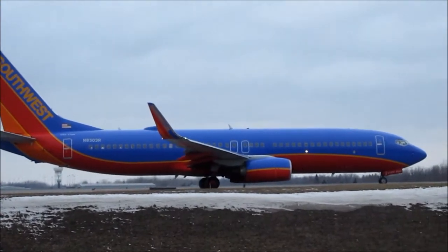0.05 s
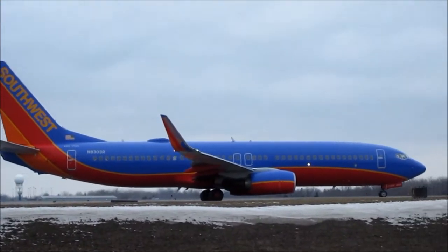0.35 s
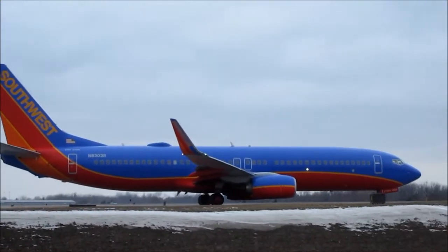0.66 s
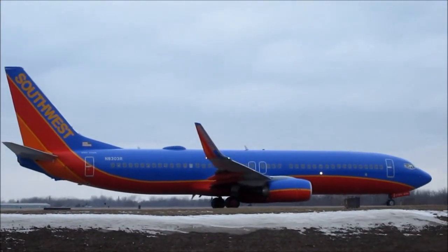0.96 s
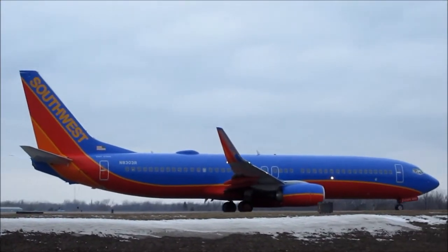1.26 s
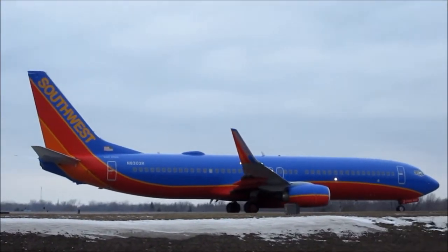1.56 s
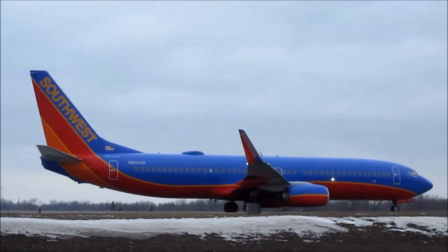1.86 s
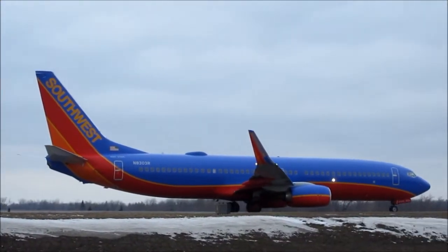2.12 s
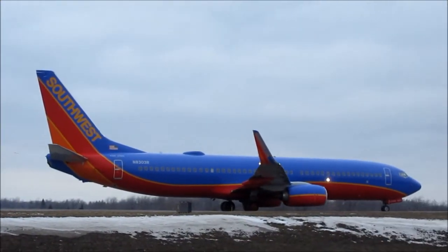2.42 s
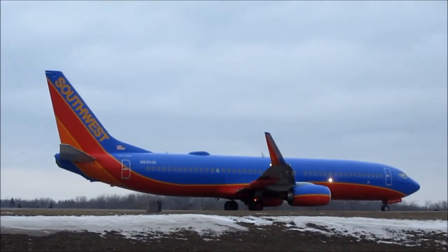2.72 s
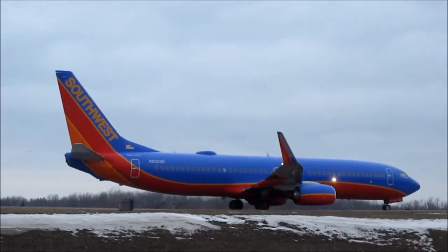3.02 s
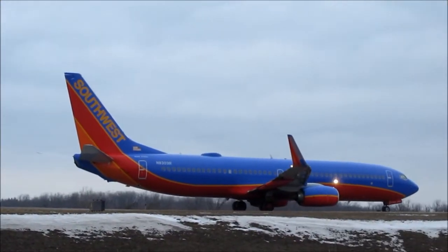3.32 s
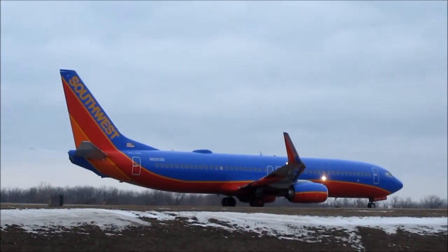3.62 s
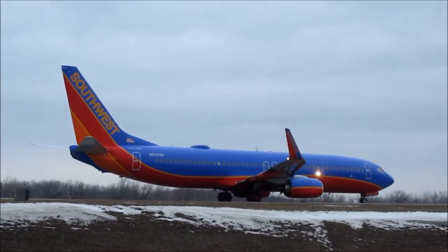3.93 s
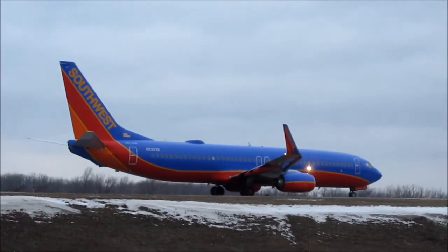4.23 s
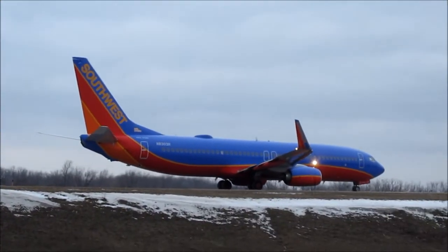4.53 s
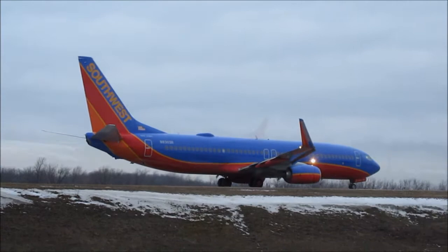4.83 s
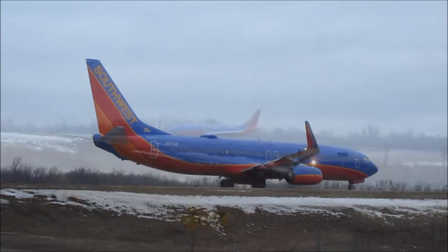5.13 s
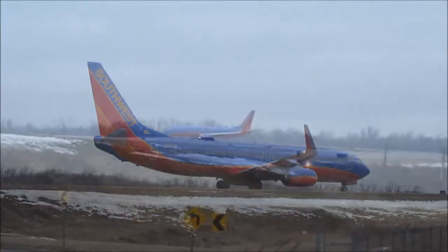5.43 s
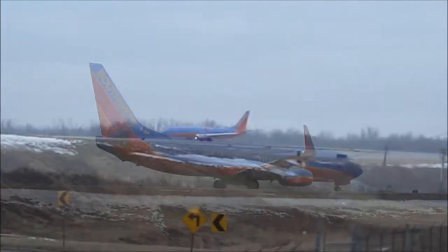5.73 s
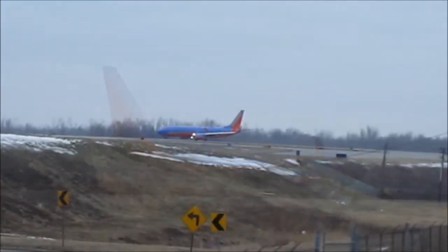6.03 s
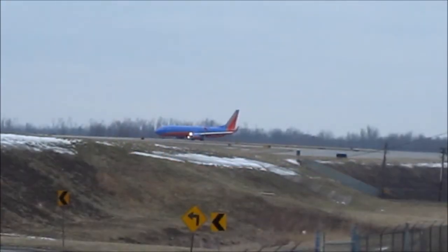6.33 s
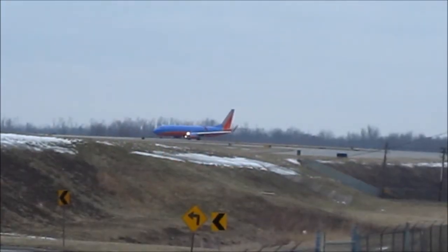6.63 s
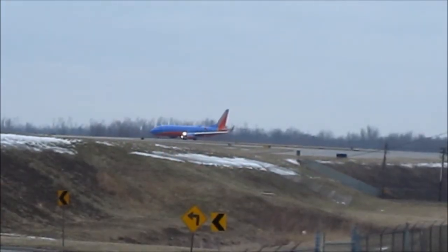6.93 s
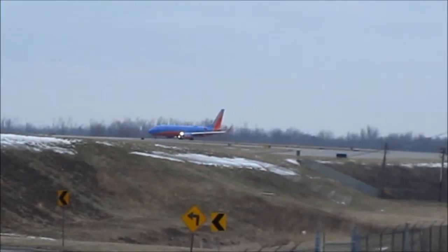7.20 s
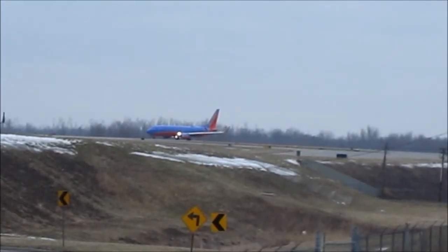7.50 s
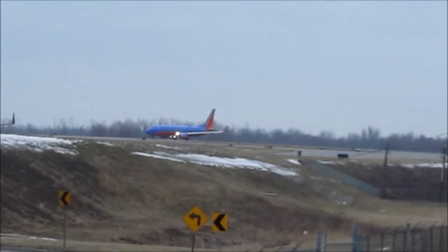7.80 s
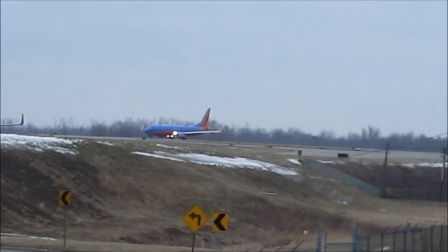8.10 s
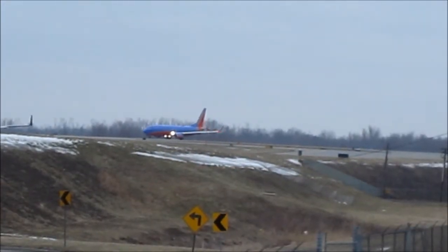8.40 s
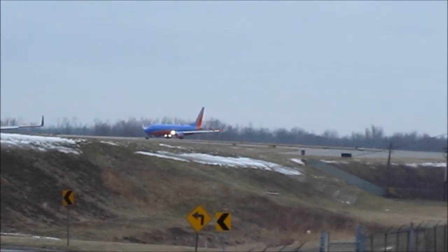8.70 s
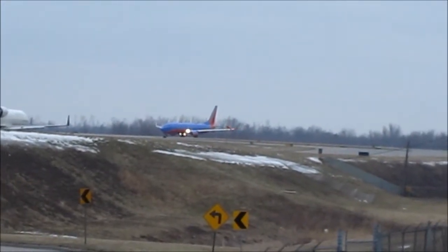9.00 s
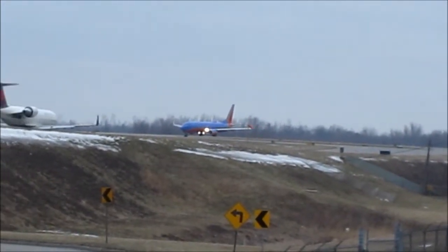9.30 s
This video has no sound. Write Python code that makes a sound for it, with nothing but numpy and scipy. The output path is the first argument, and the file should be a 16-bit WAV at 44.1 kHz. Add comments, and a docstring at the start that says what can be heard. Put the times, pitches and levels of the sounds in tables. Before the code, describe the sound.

Wind rumbles and crackles on the microphone outdoors while a nearby jet rolls past with a broad roar, bright hiss and slowly falling whine. The wind drops and the engines carry on, with three quick, dry ticks close by. An abrupt cut leaves the softer, muffled rumble and hum of a faraway airliner, broken by one late thump of wind.

```python
"""An airliner taxis past close by, its turbofans roaring in broad resonances under a compressor whine.
At first gusts buffet and pop on the microphone and make the gain control duck the jet.
The wind dies, the whine sinks to idle, and three sharp ticks come just after five seconds.
At six seconds the sound cuts to a distant airliner, a dull roar with a low hum,
and near the end the wind thumps once more."""
import sys
import numpy as np
from scipy import signal
from scipy.fft import rfft, irfft, next_fast_len
from scipy.io import wavfile
from scipy.ndimage import uniform_filter1d, map_coordinates

SR = 44100
rng = np.random.default_rng(int(sys.argv[2]) if len(sys.argv) > 2 else 0)


def output_pcm(signal):
    """Save a mono or channel-first signal as 16-bit PCM at the path in sys.argv[1].

    Samples are clipped to [-1, 1] before scaling.
    """
    pcm = np.clip(np.atleast_2d(signal).T, -1, 1) * 32767
    wavfile.write(sys.argv[1], SR, np.round(pcm).astype(np.int16))


N = 412323
TIME_S = np.arange(N) / SR
CUT_S = 6.026  # the near jet ends and the distant one begins


def amp(db):
    """Decibels to gain."""
    return 10 ** (np.asarray(db) / 20)


def unit(x):
    """x at rms 1."""
    return x / np.sqrt(np.mean(np.abs(x) ** 2) + 1e-20)


def curves(rows):
    """Automation: one value per sample for each column after the time."""
    times, *columns = np.transpose(rows)
    return [np.interp(TIME_S, times, column) for column in columns]


def wobble(rate):
    """A smooth random curve, rate knots a second."""
    count = int(N * rate / SR) + 4
    steps = np.arange(0, count - 1, 1 / 20)
    return np.interp(TIME_S * rate, steps, map_coordinates(rng.standard_normal(count), [steps]))


def filtered(x, response):
    """x through an EQ whose gain is response(hz)."""
    size = next_fast_len(N + 8192)
    return irfft(rfft(x, size) * response(np.fft.rfftfreq(size, 1 / SR)), size)[..., :N]


def rush(spectrum):
    """Noise of rms 1, coloured by (freq_hz, relative_db) points."""
    freq_hz, db = np.transpose(spectrum)
    colour = lambda hz: amp(np.interp(np.log(hz + 1), np.log(freq_hz), db))
    return unit(filtered(rng.standard_normal(N), colour))


def resonance(centre_hz, width_hz, order=2):
    """Noise of rms 1 ringing around a fixed or moving centre; a higher order has steeper skirts."""
    coarse_s = TIME_S[::6]
    offset_hz = np.fft.fftfreq(len(coarse_s), coarse_s[1])
    real, imag = rng.standard_normal((2, len(coarse_s)))
    swell = np.fft.ifft((real + 1j * imag) / np.sqrt(1 + (2 * offset_hz / width_hz) ** (2 * order)))
    phase = 2 * np.pi * np.cumsum(centre_hz * np.ones(N)) / SR
    return unit(np.real(np.interp(TIME_S, coarse_s, swell) * np.exp(1j * phase)))


def beam(peak_db, depth_db, peak_s, spread_s):
    """Gain of an engine part whose beam sweeps past the listener as the aircraft rolls by."""
    on_beam = np.exp(-((TIME_S - peak_s) / spread_s) ** 2 / 2)
    return amp(peak_db - depth_db * (1 - on_beam))


# Colours of the distant roar and its hiss: freq_hz, relative_db
FAR_ROAR_EQ = [(20, -11), (50, -11.5), (110, 2), (170, -2), (300, -1.5), (420, -8.5), (650, -1),
               (850, -6.5), (1080, -6), (1500, -14), (2000, -19.5), (2400, -23.5), (3000, -35.5),
               (5000, -61), (12000, -90)]
FAR_HISS_EQ = [(1800, -33), (2700, 0.5), (3400, 1.5), (4300, -5), (5400, -3.5), (6900, -9), (8000, -8.5),
               (12000, -16.5), (15800, -26)]
# Distant engine tones: pitch_hz, level_db
HUM_TONES = [(160, -39), (214, -37.5), (263.6, -36), (317, -40.5), (421, -45.5), (528, -43.5), (582, -48),
             (630, -38.5), (680, -42.5), (1733, -52), (4613, -67), (7881, -75)]

def far_jet():
    """Distance leaves a dull roar, a trace of hiss and a few tones that fade in and out."""
    since_s = np.maximum(TIME_S - CUT_S, 0)
    approach_db = 0.5 * since_s  # the jet comes nearer
    roar = amp(-27.5 + approach_db + 0.66 * wobble(15)) * rush(FAR_ROAR_EQ)
    settling_db = 4.5 * np.exp(-(since_s / 0.58) ** 2)
    hiss = amp(-49.5 + settling_db) * rush(FAR_HISS_EQ)
    hum = np.zeros(N)
    for hz, db in HUM_TONES:
        fading = amp(3.2 * wobble(10))
        tone = np.sin(2 * np.pi * hz * TIME_S + 0.9 * wobble(9))
        hum += amp(db) * unit(fading * tone)
    return roar + hiss + hum


# Ticks close to the microphone: start_s, peak_db, low_hz, high_hz, length_s
TICK_HITS = [(5.2486, 5, 1880, 7100, 0.00193), (5.3806, 0, 3000, 9000, .0012),
             (5.4456, 1, 1500, 3980, 0.00065)]

def ticks():
    """Dry, bright bursts a millisecond or two long, their energy spread evenly over their band."""
    out = np.zeros(N)
    for start_s, peak_db, low_hz, high_hz, length_s in TICK_HITS:
        size = round(length_s * SR)
        flat_noise = irfft(np.exp(2j * np.pi * rng.random(size)), size)
        burst = np.pad(flat_noise * signal.windows.tukey(size), (0, size))
        band = signal.butter(2, [low_hz, high_hz], "bandpass", fs=SR, output="sos")
        tick = signal.sosfilt(band, burst)
        out[round(start_s * SR):][:len(tick)] += amp(peak_db) * tick / np.abs(tick).max()
    return out


def add_eddy(out, time_s, peak_db, pitch_hz):
    """An eddy pops on the microphone: one swing of pressure, of random lopsidedness."""
    phase = 2 * np.pi * pitch_hz * np.arange(-256, 256) / SR
    swing = signal.hilbert(phase * np.exp((1 - phase ** 2) / 2))
    pop = np.real(swing * np.exp(2j * np.pi * rng.random())) / np.abs(swing).max()
    out[round(time_s * SR) - len(pop) // 2:][:len(pop)] += amp(peak_db) * pop


# Gusts over the steady wind: start_s, hold_s, boost_db (negative for a lull)
GUST_SWELLS = [(0.037, 0.016, 9), (0.167, 0.018, 8.5), (0.248, .08, -7), (0.385, 0.0092, 2.5),
               (0.49, 0.072, 4), (0.598, 0.12, 11), (1.07, 0.2, 6.5), (1.108, .02, 0), (1.32, .015, 7),
               (1.38, 0.056, -8), (1.489, .005, 6.5), (1.604, 0.13, 2), (1.817, 0.22, 6), (1.949, 0.015, 9)]

def gust_db(time_s, attack_s=0.024, release_s=0.04):
    """The wind's boost at time_s: each gust rises quickly, holds and lets go."""
    return sum(db * np.interp(time_s, [s - attack_s, s, s + hold, s + hold + release_s], [0, 1, 1, 0])
               for s, hold, db in GUST_SWELLS)


# Colour of the buffeting: freq_hz, relative_db
BUFFET_EQ = [(15, -25), (35, -15), (70, -3.5), (150, 1), (250, -3.5), (450, -5.5), (750, -15.5),
             (1300, -29.5), (2200, -33), (4000, -36), (12000, -90)]
# The strongest eddies: time_s, peak_db (before the gust's boost), pitch_hz
EDDY_POPS = [(.124, -3, 400), (.164, -4, 400), (.471, 0, 564), (.502, 1, 598), (.542, -1, 550),
             (0.573, 6.5, 900), (.587, 5.5, 910), (.624, 4, 710), (.637, 1.5, 800), (.694, 4, 1020),
             (1.034, -0.5, 510), (1.093, 1, 604), (1.111, 5.5, 950), (1.17, 3, 650), (1.213, -2, 610),
             (1.258, -1, 905), (1.336, -7, 371), (1.478, 1, 715), (1.802, 4.5, 750), (1.818, -3, 800),
             (1.873, 3, 600), (1.905, 3.5, 670), (1.928, 5, 950), (1.942, -4.5, 1240), (1.998, -3.5, 670),
             (2.027, -2.5, 690), (2.143, -5, 810), (2.233, -5, 552.7), (8.085, -11, 420),
             (9.017, -4.5, 397), (9.028, 6, 410), (9.18, -13, 300)]

def wind(calm_s=2.44, fade_s=0.69):
    """Lumpy buffeting; strong eddies pop, and while it blows each brings a crackle of smaller ones."""
    fade = np.clip((calm_s - TIME_S) / fade_s, 0, 1)
    lumps = amp(1.4 * wobble(39.53) + 4.5 * wobble(250))
    out = fade * amp(-13.5 + gust_db(TIME_S)) * unit(lumps * rush(BUFFET_EQ))
    for time_s, db, hz in EDDY_POPS:
        peak_db = db + gust_db(time_s)
        add_eddy(out, time_s, peak_db, hz)
        if time_s < calm_s:
            for delay, strength, detune in rng.standard_normal((6, 3)):
                crackle_db = peak_db - 8 + 2 * strength
                add_eddy(out, time_s + 0.012 * delay, crackle_db, hz * np.exp(0.25 * detune))
    return out


# Colour of the exhaust: freq_hz, relative_db
EXHAUST_EQ = [(20, -21), (50, -5), (110, 2), (170, -0.5), (235, -4), (460, 2), (640, -2.5), (800, 0),
              (1050, -4.5), (1450, -3.5), (1800, -10), (2080, -5.5), (2450, -14.5), (4000, -53),
              (12000, -90)]
# Its fader ride: time_s, level_db
EXHAUST_RIDE = [(0, -19.5), (2.2, -20.5), (4.5, -20), (6, -16.5)]

def exhaust():
    """The exhaust rumbles, weakest when the aircraft is side-on."""
    level_db, = curves(EXHAUST_RIDE)
    return amp(level_db) * rush(EXHAUST_EQ)


# Glide of the two core resonances: time_s, lower_hz, upper_hz
CORE_GLIDE = [(0, 778, 1115), (2, 848.3, 1167), (3.5, 916.5, 1210), (6, 910.4, 1232)]

def core():
    """A hollow drone under two broad resonances that rise as the angle to the engine changes."""
    lower_hz, upper_hz = curves(CORE_GLIDE)
    hollow = resonance(364, 88) + amp(-5) * resonance(328, 15)
    hollow *= beam(-20.5, depth_db=13.5, peak_s=3, spread_s=1.8)
    lower = beam(-17, depth_db=9, peak_s=5, spread_s=1.07) * resonance(lower_hz, 180, order=3)
    upper = beam(-20, depth_db=7, peak_s=4.5, spread_s=1.8) * resonance(upper_hz, 160)
    return hollow + lower + upper


# Colours of the fan's rush and the hiss above it: freq_hz, relative_db
FAN_EQ = [(500, -89), (2100, -5), (2550, -4), (2850, -0.5), (3200, 0), (3650, -4), (4200, -9),
          (4700, -14.5), (6500, -38), (12000, -90)]
HISS_EQ = [(3000, -24), (4500, -0.5), (5300, 1), (6000, -0.5), (6900, 1), (7500, -2), (8150, -3),
           (8900, -10.5), (9800, -11), (11200, -14), (12200, -23), (14000, -28), (15800, -36)]

def fan_rush(treble_db):
    """The fan beams a bright rush under a hiss; the hiss follows the treble's swell more deeply."""
    fan = beam(-24.5, depth_db=8, peak_s=1.5, spread_s=2.6) * rush(FAN_EQ)
    hiss = amp(-30.5 + treble_db) * rush(HISS_EQ)
    return amp(0.37 * treble_db) * fan + hiss


# Glide of the compressor's blade tone: time_s, pitch_hz
WHINE_GLIDE = [(.25, 11670), (1, 11345), (1.6, 11060), (2.1, 10870), (2.6, 10730), (3.1, 10600),
               (3.8, 10420), (6, 10460)]

def compressor_whine():
    """The compressor spools down to idle; turbulence scatters part of its tone into a broad skirt."""
    pitch_hz, = curves(WHINE_GLIDE)
    skirt = resonance(pitch_hz, 420)
    skirt += amp(-22) * resonance(1.222 * pitch_hz, 200)  # a lesser blade row on the same shaft
    blade_tone = beam(-42, depth_db=5.5, peak_s=3, spread_s=1.0) * resonance(pitch_hz, 19)
    return blade_tone + beam(-42.5, depth_db=15, peak_s=2, spread_s=3.5) * skirt


# Fan and turbine tones: pitch_hz, width_hz, level_db, peak_s, spread_s
TURBINE_TONES = [(2166, 120, -33, 0.72, 1.2), (2578, 22, -35, 6.06, .45), (3160, 70, -33, 2.2, 0.83),
                 (3460, 55, -38.5, 5.9, .55), (4200, 81, -40, 0.74, 1.3), (5260, 26, -43, 4.0, 1.1),
                 (5160, 260, -40, 4.2, 1), (6620, 200, -42, 2.2, 1.2)]

def turbine_tones(depth_db=28):
    """Tones of steady pitch, each swelling as its own beam sweeps past."""
    return sum(beam(db, depth_db, peak_s, spread_s) * resonance(hz, width_hz)
               for hz, width_hz, db, peak_s, spread_s in TURBINE_TONES)


# The treble swells and fades on its way through the air: time_s, swell_db (in full on the hiss)
TREBLE_RIDE = [(0, -2), (2.15, -1), (2.75, -0.5), (2.97, .5), (3.23, -6), (3.45, -1.5), (3.8, -3),
               (4.1, -3), (4.28, -9.5), (4.6, -4), (4.92, -10), (5.08, -6.5), (5.85, -3)]

def near_jet():
    """Exhaust and core roar below; fan rush, tones and whine flutter above in the moving air."""
    treble_db, = curves(TREBLE_RIDE)
    roar = exhaust() + core()
    air = fan_rush(treble_db)
    whine = compressor_whine()
    tones = turbine_tones()
    flutter = amp(1.1 * wobble(35) + 0.4 * wobble(12))
    whine *= amp(1.5 * wobble(9))
    return roar + flutter * (air + amp(0.65 * treble_db) * (tones + whine))


def scene():
    """The near jet, then a hard cut to the distant one, with wind and ticks laid on top."""
    near = np.clip((CUT_S - TIME_S) / 0.0018 + 0.5, 0, 1)
    return (near * near_jet() + (1 - near) * far_jet() + wind() + ticks())[None]


def record(dry, ceiling_db=-13.5, window_s=0.055, top_hz=15800):
    """Gain control holds the rms under a ceiling; peaks clip at full scale and the very top is cut."""
    rms = np.sqrt(np.abs(uniform_filter1d(dry ** 2, round(window_s * SR), axis=-1)))
    gain = 1 / np.maximum(rms / amp(ceiling_db), 1)
    return filtered(np.clip(gain * dry, -1, 1), lambda hz: hz < top_hz)


dry = scene()
out = record(dry)
output_pcm(out)
```